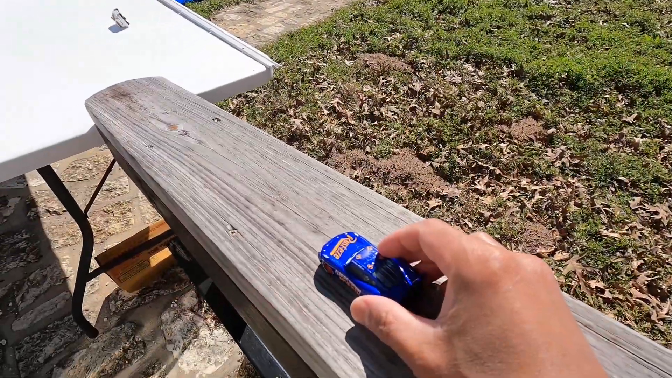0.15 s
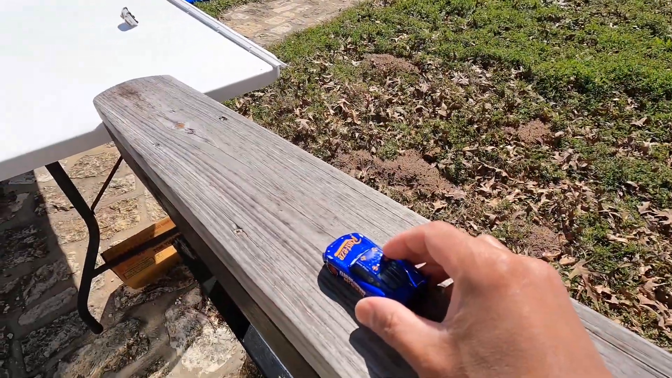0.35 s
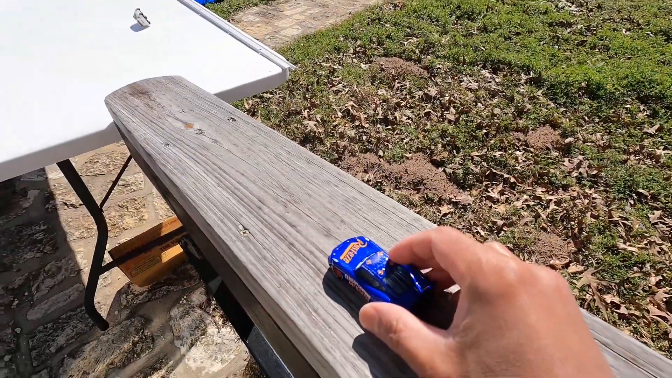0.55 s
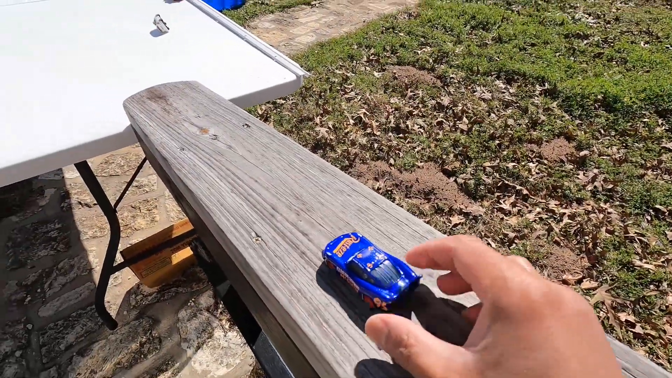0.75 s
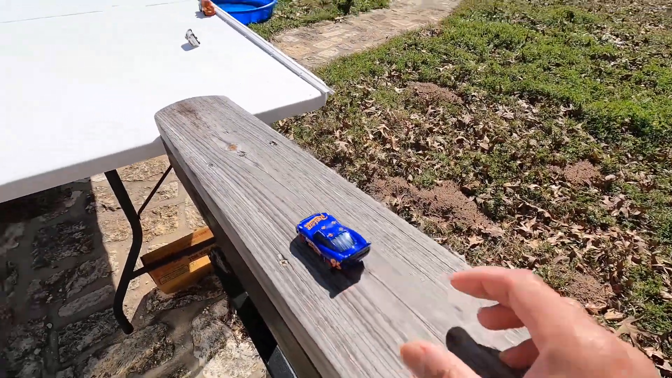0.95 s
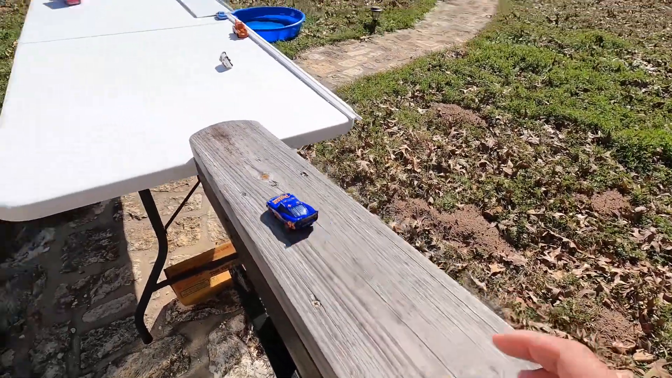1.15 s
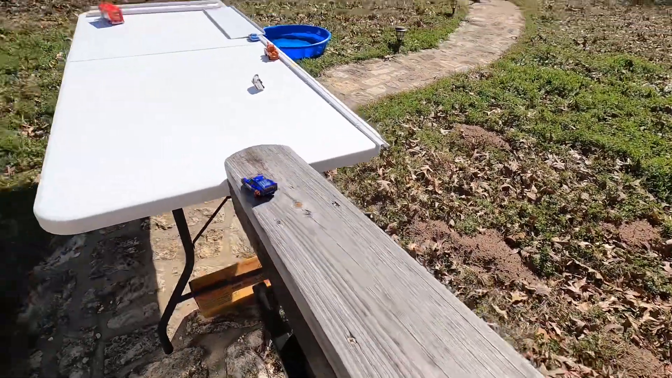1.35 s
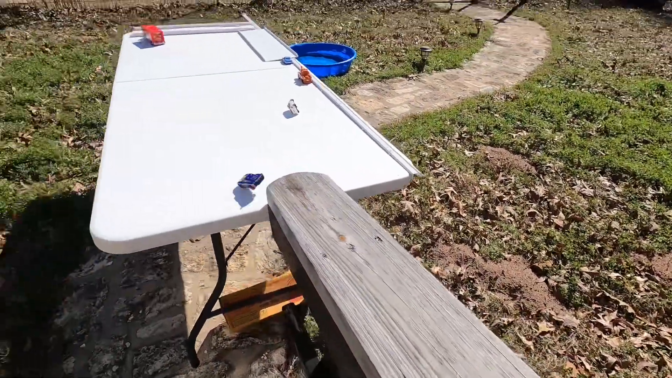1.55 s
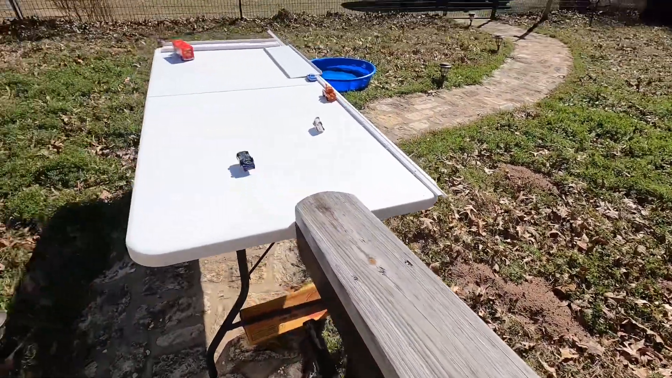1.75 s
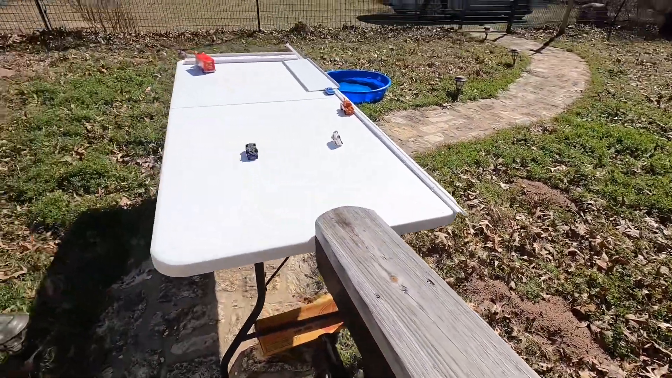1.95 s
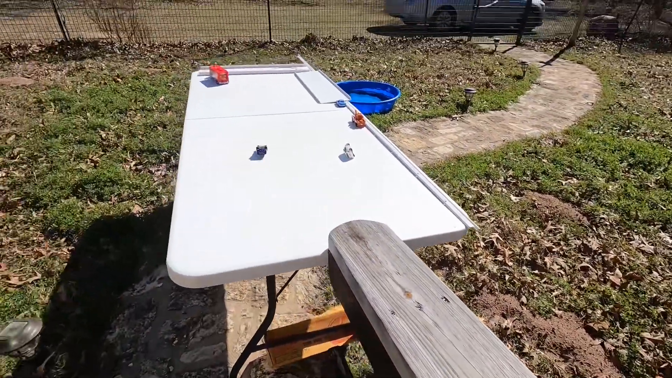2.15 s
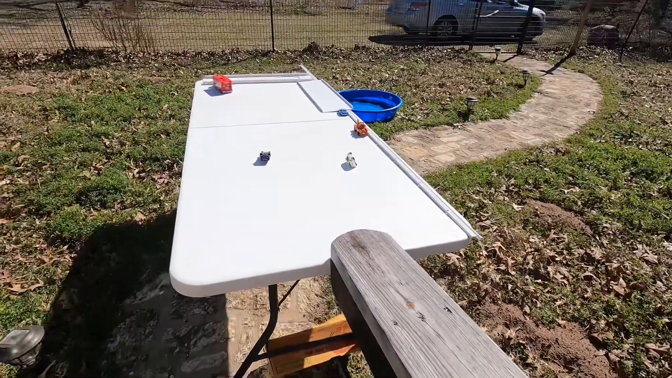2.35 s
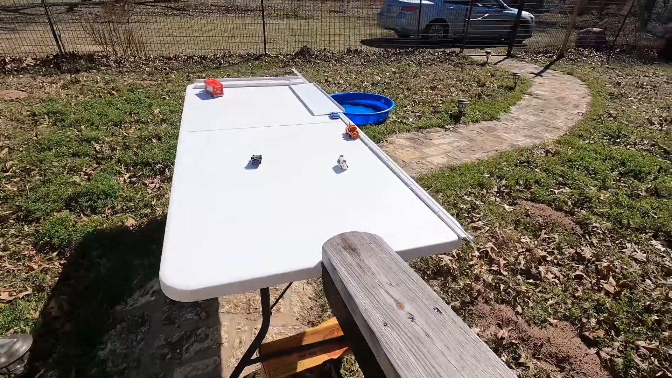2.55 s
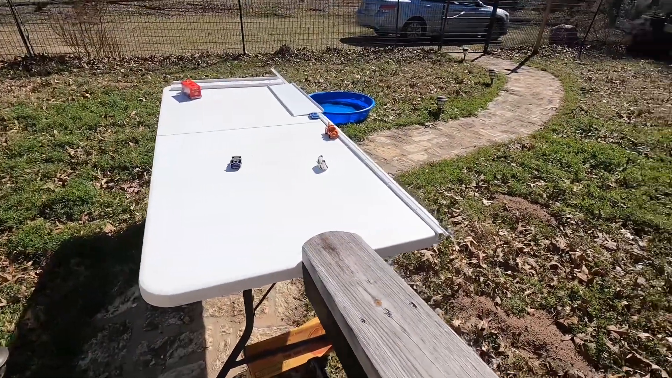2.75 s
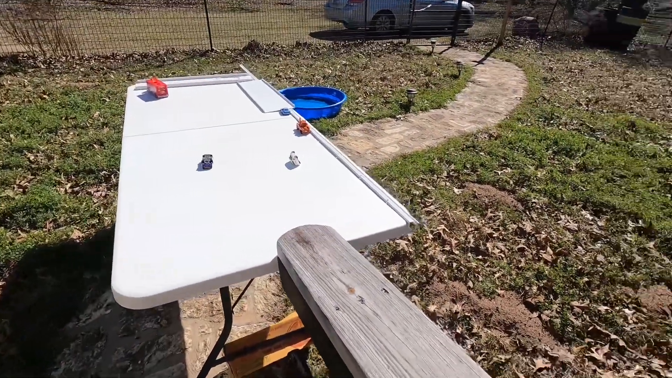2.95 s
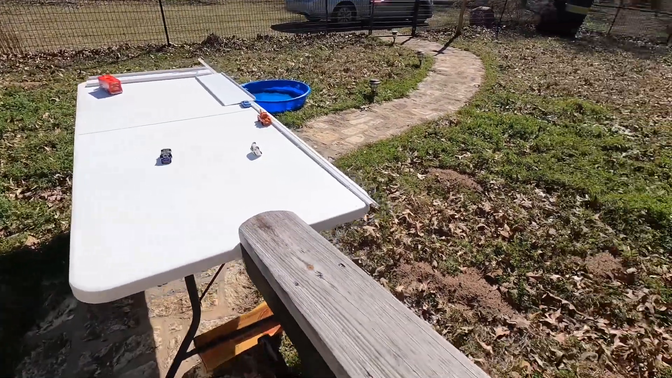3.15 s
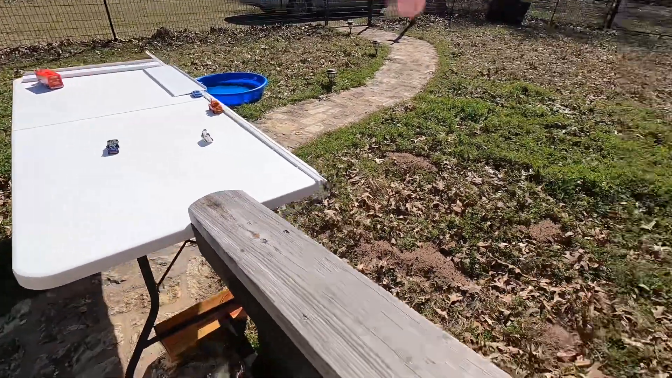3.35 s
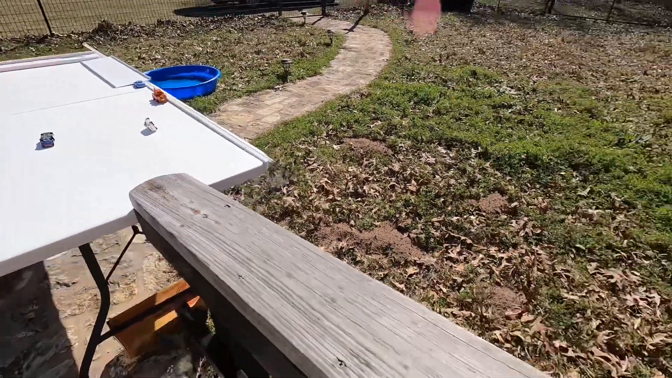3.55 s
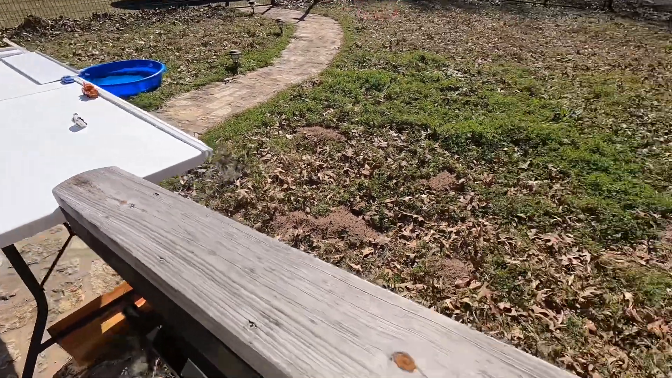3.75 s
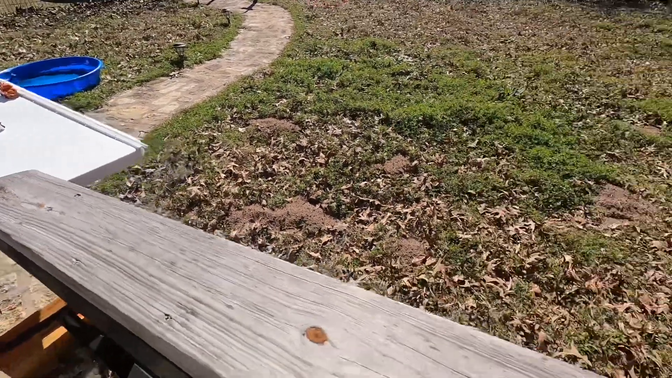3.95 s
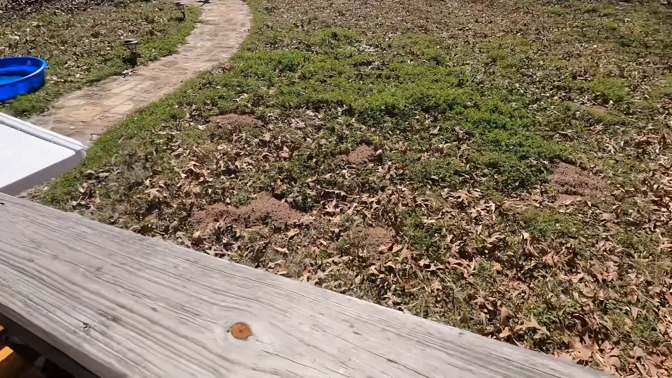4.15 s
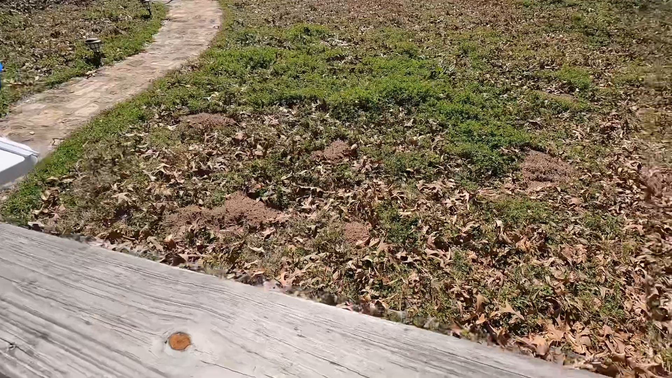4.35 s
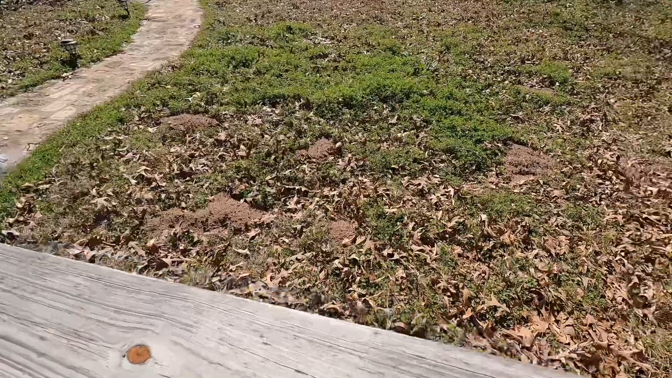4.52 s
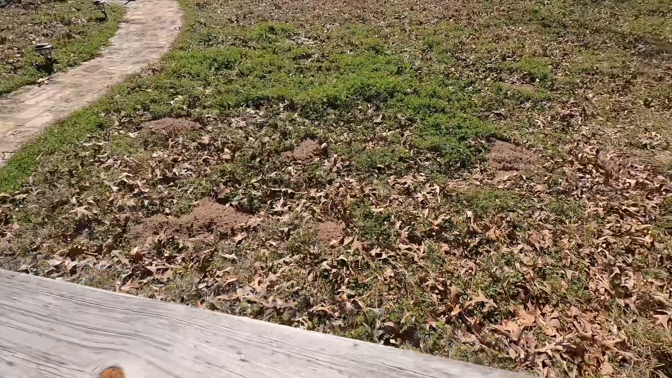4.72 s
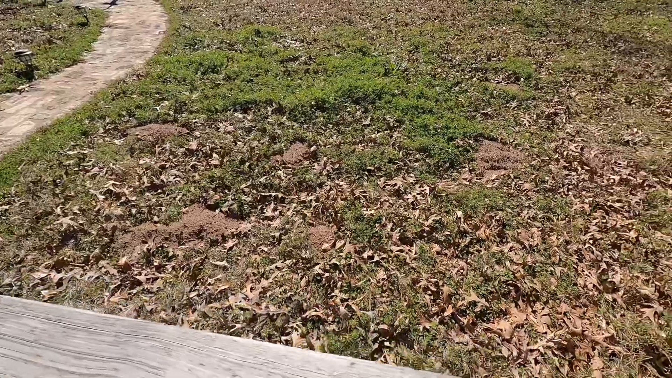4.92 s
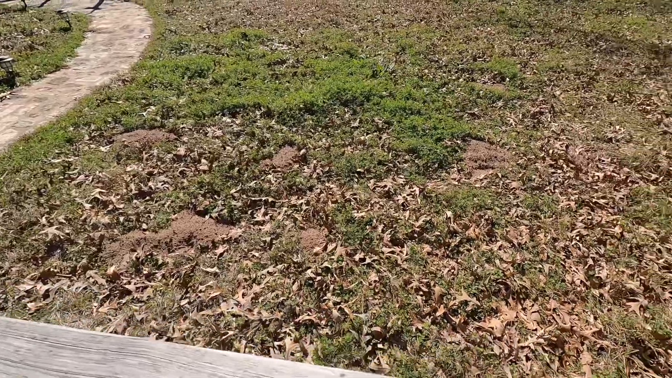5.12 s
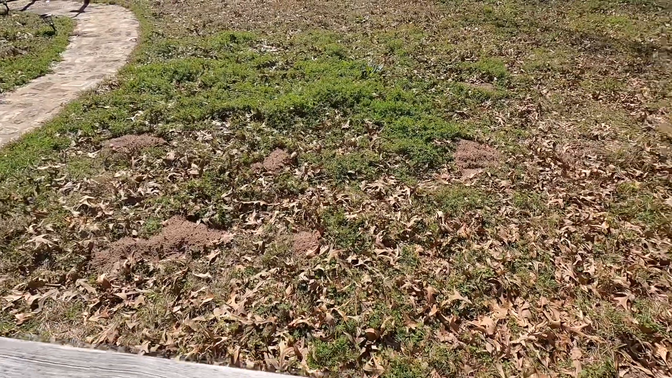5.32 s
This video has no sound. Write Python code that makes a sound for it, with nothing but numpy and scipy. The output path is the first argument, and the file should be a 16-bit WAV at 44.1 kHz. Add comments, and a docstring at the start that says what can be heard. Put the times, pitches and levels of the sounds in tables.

```python
"""A light wind over even garden hiss, then a die-cast toy car rattles down a sloping wooden plank, moving away
from the microphone, drops onto a plastic folding table, bounces and rolls out while the hollow top drones.
A lone knock follows; at the end something is handled close by with knocks, scrapes and squeaks.
Random contacts excite resonances for rolling and dragging, decaying modes make the blows, wandering sines
the friction notes, and shaped noise the wind and the air."""
import sys
import numpy as np
from scipy import signal
from scipy.fft import rfft, irfft, next_fast_len
from scipy.io import wavfile
from scipy.ndimage import uniform_filter1d

SR = 44100
rng = np.random.default_rng(int(sys.argv[2]) if len(sys.argv) > 2 else 0)


def store_pcm(level_fs):
    """Save levels as 16-bit WAV."""
    pcm = np.round(np.clip(level_fs, -1, 1) * 32767).astype(np.int16)
    wavfile.write(sys.argv[1], SR, np.atleast_2d(pcm).T)


N = 241793

# modes of the table top with the car on it: (frequency [Hz], relative level [dB], decay by 60 dB [s])
TABLE_MODES = [(135, 3.5, 0.21), (166.8, 0.5, 0.34), (195.5, 2, 0.28), (263, -0.5, 0.21), (311.8, 0, 0.24),
               (380.5, -5, 0.2), (445, -2, 0.18), (502, -3, 0.16), (587, -18, 0.35), (697, -35, 0.089),
               (774, -21, 0.036), (990, -19.5, 0.27), (1127, -0.5, 0.072), (1565, -8, .08),
               (1816, -2.5, 0.11), (1977, 9.5, 0.02), (2330, -12.5, 0.052), (2760, 9, 0.021),
               (2960, -15, 0.022), (3500, -11, 0.054), (3840, -27.5, 0.016), (4500, -18, 0.018),
               (4790, 6.5, .025), (6900, -21, 0.0067), (6560, -3, .02), (9250, 2, 0.04)]


def from_db(db):
    """Decibels to gain."""
    return 10 ** (np.asarray(db) / 20)


def rms_one(x):
    """Scale to unit rms."""
    return x / np.sqrt(np.mean(x ** 2) + 1e-20)


def in_time(rows):
    """Each column of a curve at every sample."""
    s, *columns = np.transpose(rows)
    return [np.interp(np.arange(N) / SR, s, column) for column in columns]


def at_hz(points, hz):
    """Read a table along log frequency."""
    f, value = np.transpose(points)
    return np.interp(np.log(np.maximum(hz, 1)), np.log(f), value)


def band(x, low_hz, high_hz):
    """Causal band-pass; neighbouring bands meet in opposite phase, so they are joined with opposite signs."""
    edges = [low_hz, min(high_hz, SR / 2 - 1000)]
    return signal.sosfilt(signal.butter(2, edges, "band", fs=SR, output="sos"), x + 1e-18)


def shaped(x, response):
    """Filter by a gain, real or complex, given as a function of frequency."""
    size = next_fast_len(N + 4096)
    hz = np.arange(size // 2 + 1) * SR / size
    return irfft(rfft(x, size) * response(hz), size)[..., :N]


def coloured(x, spectrum):
    """Give a steady excitation its spectrum, cut below half the lowest listed frequency; rms 1."""
    return rms_one(shaped(x, lambda hz: from_db(at_hz(spectrum, hz)) * (hz > spectrum[0][0] / 2)))


def drift(rate):
    """Straight lines between random values of spread 1, `rate` of them a second."""
    knots = rng.standard_normal(8192)
    return np.interp(np.arange(N) / SR * rate, np.arange(len(knots)), knots)


def evened(x, window_s):
    """Hold the short-time rms at 1."""
    power = uniform_filter1d(x ** 2, max(int(window_s * SR), 8))
    return x / np.sqrt(np.abs(power) + 1e-12)


def grains(per_s, spread_db):
    """Random tiny contacts of uneven size and either sign."""
    sizes = from_db(spread_db * np.minimum(rng.exponential(1, N), 4)) * rng.choice([-1, 1], N)
    return sizes * (rng.random(N) < per_s / SR)


def ring(x, hz, t60):
    """A unit click sets a sine ringing from about height 1, falling 60 dB in t60 seconds."""
    r, w = from_db(-60 / (t60 * SR)), 2 * np.pi * hz / SR
    return signal.lfilter([0, np.sin(w)], [1, -2 * r * np.cos(w), r * r], x + 1e-18)


def add(out, s, sound):
    """Mix a sound in at time s."""
    at = max(round(s * SR), 0)
    out[at:at + len(sound)] += sound[:N - at]


def swells(rows):
    """Gain of overlapping swells; each climbs tenfold in its rise time and sinks tenfold in its fall time."""
    t = np.arange(N) / SR
    power = 0
    for s, db, rise, fall in rows:
        power = power + from_db(db - 20 * np.maximum((s - t) / rise, (t - s) / fall)) ** 2
    return np.sqrt(power)


def held(start_s, stop_s, release_db_per_s, attack_db_per_s=450):
    """Attack, hold at gain 1, release."""
    t = np.arange(N) / SR
    attack_db = -attack_db_per_s * np.maximum(start_s - t, 0)
    return from_db(attack_db - release_db_per_s * np.maximum(t - stop_s, 0))


def wavering_tone(hz, waver_hz, rate, flutter_db):
    """A friction note that wanders in pitch and strength; rms 1."""
    phase = 2 * np.pi * np.cumsum(hz + waver_hz * drift(rate)) / SR
    return rms_one(np.sin(phase) * from_db(flutter_db * drift(rate)))


def chassis(clicks):
    """The loose wheels and axles ring for only a few cycles, each resonance broad and quickly damped."""
    # resonances of wheels and chassis: (frequency [Hz], width [Hz], relative level [dB])
    resonances = [(1450, 820, -3), (1872, 556, 7), (2280, 715, 5), (2930, 650, -2), (4090, 480, -4.5),
                  (5210, 290, -6), (6970, 1550, -12.5), (9260, 150, -11.5), (9900, 1300, -23),
                  (13100, 2000, -67)]
    out = 0
    for k, (hz, width, db) in enumerate(resonances):
        r = np.exp(-np.pi * width / SR)
        feed = [(1 - r * r) / 2, 0, (r * r - 1) / 2]
        feedback = [1, -2 * r * np.cos(2 * np.pi * hz / SR), r * r]
        out = out + (-1) ** k * from_db(db) * signal.lfilter(feed, feedback, clicks + 1e-18)
    return out


def plank_roll(per_s=700, spread_db=6.5, hiss=0.52, jolt_db=-2.5, top_hz=11000, rattle_top_hz=2700,
               lift_db_per_s=220):
    """Wood grain shakes the chassis, louder and brighter with speed; ridges jolt it, and the plank rumbles."""
    # wheels jolting over ridges of the grain: (time less 1.1 ms [s], peak level before jolt_db [dB])
    jolts = [(0.8823, -24), (0.8914, -26), (0.9123, -26), (0.9428, -30), (0.966, -20.5), (0.9764, -20),
             (0.9907, -20), (1.0155, -20), (1.0478, -29), (1.094, -24.5), (1.1065, -21.5), (1.1354, -17),
             (1.1407, -20.5), (1.1544, -21), (1.2035, -23), (1.2268, -20), (1.2472, -21.5), (1.2784, -24),
             (1.3129, -22), (1.3333, -17), (1.3376, -20), (1.3527, -19.5), (1.362, -18), (1.3823, -23),
             (1.424, -17.5), (1.4417, -21.5)]
    # the car gathers speed evenly from its release to the plank's end, moving away from the microphone
    release_s, plank_end_s = 0.61, 1.457
    plank_m, microphone_m = 1, 0.34
    # level at full speed beside the microphone [dB], growth [dB per tenfold speed]
    rattle_db, rattle_growth_db = -30, 30
    treble_db, treble_growth_db = -37, 36
    # the plank rumbles faintly, and much more over the last stretch, where it rests on the table
    wood_db, resting_db, resting_s = -58, -42.5, 1.345
    jolt_settle_s = 0.003

    speed = np.clip((np.arange(N) / SR - release_s) / (plank_end_s - release_s), 1e-6, 1)
    distance_m = np.hypot(microphone_m, plank_m * speed ** 2)
    nearness = held(release_s, plank_end_s, lift_db_per_s) * microphone_m / distance_m
    rattle = nearness * from_db(rattle_db + rattle_growth_db * np.log10(speed))
    treble = nearness * from_db(treble_db + treble_growth_db * np.log10(speed))
    rumble = from_db(wood_db) * nearness
    rumble += from_db(resting_db) * held(resting_s, plank_end_s, release_db_per_s=70.5)

    contacts = grains(per_s, spread_db) + hiss * rng.standard_normal(N)
    body = chassis(contacts)
    out = rattle * evened(band(body, 860, rattle_top_hz), 0.096)
    out -= treble * evened(band(body, 4100, top_hz), 0.26)
    # colour of the plank: (frequency [Hz], relative level [dB])
    wood = [(90, -26.5), (150, 2.5), (195, 14), (260, -21.5), (450, -9), (800, -20.5), (1400, -11.5),
            (3000, -32.5)]
    out += rumble * evened(coloured(contacts, wood), 0.018)

    t = np.arange(1000) / SR
    for s, peak_db in jolts:
        settling = 0.16 * rng.standard_normal(len(t)) * np.exp(-t / jolt_settle_s)
        jolt = band(chassis((t == 0) + settling), 450, top_hz)
        add(out, s + 0.0011, from_db(peak_db + jolt_db) * jolt / np.abs(jolt).max())
    return out


def table_roll(boom_db=-2, skid_rumble_db=3, uneven_db=4.5, echo=1.0, far_s=0.012, near_s=.009):
    """The pebbled plastic top drones under the wheels, an uneven rattle above that fades as the car slows."""
    # the drone's pitch wanders as the car crosses the top: (time [s], pitch [Hz])
    drone_pitch = [(1.87, 178.3), (1.96, 151.7), (2.05, 158.7), (2.13, 134.1), (2.19, 160.3), (2.24, 125.5),
                   (2.31, 146), (2.42, 158), (2.7, 135), (2.82, 101.5)]
    # colour of the rattle: (frequency [Hz], relative level [dB])
    rattle_colour = [(260, 6.5), (400, 0.5), (600, -3.5), (800, -14), (990, -5.5), (1300, -9.5),
                     (1790, -10), (2100, -11.5), (2330, -7), (2600, -14), (5200, -21.5), (7800, -30.5),
                     (12000, -31.5), (15000, -32)]
    # rolls: (start [s], stop [s], drone [dB], rumble [dB], rattle [dB])
    rolls = [(1.827, 2.16, -36, -39.5, -45), (2.185, 2.3, -37, -57, -52), (2.758, 2.833, -45, -84, -48.5)]
    # the loose wheels skid and clatter: (time [s], peak level [dB], rise [s], fall [s])
    skids = [(1.865, -40, 0.044, 0.073), (1.99, -52.5, 0.042, 0.087), (2.18, -46.5, 0.047, 0.052)]
    # wheel noise fades as the car slows and dies when it stops; the hollow top rings on
    slowing_db_per_s, wheel_release_db_per_s, top_release_db_per_s = 13.5, 600, 172.5

    pitch, = in_time(drone_pitch)
    contacts = grains(per_s=2000, spread_db=2)
    top = 0
    for k, (hz, db, t60) in enumerate(TABLE_MODES[:12]):
        top = top + from_db(db) * ring(contacts, hz, t60) * (-1) ** k
    low = wavering_tone(pitch, waver_hz=8.47, rate=42, flutter_db=2.0)
    low += from_db(boom_db) * evened(band(top + 45 * contacts, 60, 254), 0.04)

    fine = coloured(contacts, rattle_colour)
    # waves return from the table's edge ever sooner as the car rolls on, so the colour sweeps
    lag, = in_time([(1.87, far_s), (2.3, near_s)])
    fine += echo * np.interp(np.arange(N) - lag * SR, np.arange(N), fine)
    middle = evened(band(fine + 0.15 * rms_one(top), 285, 820), 0.049)
    high = from_db(uneven_db * drift(60)) * evened(band(fine, 1580, 13000), 0.14)

    out = swells(skids) * (high - from_db(skid_rumble_db) * middle)
    for start, stop, drone_db, rumble_db, rattle_db in rolls:
        slowing = from_db(-slowing_db_per_s * (np.arange(N) / SR - start))
        wheels = held(start, stop, wheel_release_db_per_s) * slowing
        out += from_db(drone_db) * held(start, stop, top_release_db_per_s) * low
        out += wheels * (from_db(rattle_db) * high - from_db(rumble_db) * middle)
    return out


def axles():
    """Spinning wheels sing thinly on their wire axles, the high note only while the car rolls out."""
    # swells of the low note: (time [s], peak level [dB], rise [s], fall [s])
    low_swells = [(1.5, -51, 0.2, 0.07), (1.88, -48, 0.02, 0.07), (2.19, -54, 0.06, 0.42)]
    low = swells(low_swells) * wavering_tone(5130, waver_hz=66.0, rate=240, flutter_db=6.5)
    high_gain = from_db(-56.5) * held(1.87, 2.15, release_db_per_s=500)
    return low + high_gain * wavering_tone(10160, waver_hz=218, rate=300, flutter_db=6.0)


def blows(rows, modes, trim_db, clack_share, dense_db, dense_t60, tail_db, tail_t60, tail_hz, crack_db,
          chatter, note_t60):
    """Each blow cracks, chatters for a few ms and rings strong modes, a dense field of weaker ones and a note."""
    # edges of the four bands a blow is levelled in: [Hz]
    edges_hz = [90, 600, 2000, 6000, 15000]
    out, t = np.zeros(N), np.arange(SR // 2) / SR
    head = t < .02
    for s, thud_db, clack_db, chatter_s, note_hz, note_db in rows:
        first = 1. * (t == 0)
        again = (rng.random(len(t)) < 2500 / SR) * rng.standard_normal(len(t))
        again = again * np.exp(-(t / chatter_s) ** 2 / 2)
        contact = first + chatter * again
        # the heavy low modes feel only the first push, the light ones every re-contact
        light = contact / np.sqrt(np.sum(contact ** 2))
        body = 0
        for k, (hz, db, t60) in enumerate(modes):
            gain = from_db(db + 2.6 * rng.standard_normal()) * (-1) ** k
            body = body + gain * ring(first if hz < 520 else light, hz, t60)
        # the dense modes are fed while the chatter lasts; the duller ones have their own decay
        quick, slow, sharp = rng.standard_normal((3, len(t)))
        dense = band(quick, 300, 5000) * from_db(-60 * np.maximum(t - chatter_s, 0) / dense_t60)
        tail = band(slow, 120, tail_hz) * from_db(-60 * t / tail_t60)
        crack = sharp * np.exp(-t / 0.0017)
        note = ring(contact, note_hz, note_t60)
        sound = rms_one(body)
        for db, layer in [(dense_db, dense), (tail_db, tail), (crack_db, crack), (note_db, note)]:
            sound = sound + from_db(db) * rms_one(layer)
        sound = band(sound, 60, 11000)
        # the bass follows the thud, the treble the clack, and the middle lies between them
        band_db = [thud_db, thud_db + clack_share * (clack_db - thud_db), clack_db, clack_db]
        for k, (db, trim) in enumerate(zip(band_db, trim_db)):
            part = band(sound, edges_hz[k], edges_hz[k + 1])
            add(out, s, (-1) ** k * from_db(db + trim) * part / np.sqrt(np.mean(part[head] ** 2)))
    return out


def landings():
    """The car's blows set the table top's modes ringing under the clack of the car."""
    # blows, levels before trim: (time [s], thud of the table [dB], clack of the car [dB], chatter [s],
    # pitch of the car's ring [Hz], level of that ring against the modes [dB])
    impacts = [(1.469, -46.5, -30, 0.00079, 2140, 0.5), (1.483, -58.5, -48, 0.0036, 5250, -9),
               (1.559, -17.5, -21.5, 0.0055, 3240, -3.5), (1.591, -47.5, -22, 0.0074, 2760, 2.5),
               (1.6455, -33.5, -30.5, 0.0041, 2200, 6.5), (1.708, -21, -26, 0.0011, 2350, -7),
               (1.7945, -20, -30, 0.0047, 2676, 1.5), (1.803, -42, -28, 0.0031, 2320, -4.5),
               (1.8335, -21.5, -31, 0.0076, 2280, -3.5), (1.851, -24.5, -32, 0.0075, 2240, 0.5),
               (2.184, -31, -55, 0.008, 2320, 10), (2.29, -43.5, -56, 0.005, 2340, 5),
               (2.831, -31, -37.5, 0.0078, 2407, 11)]
    return blows(impacts, TABLE_MODES, trim_db=[-1.5, -6.5, -0.5, -14.5], clack_share=0.58,
                 dense_db=-1.0, dense_t60=0.045, tail_db=-7.5, tail_t60=0.33, tail_hz=1440,
                 crack_db=-5.5, chatter=0.87, note_t60=0.015)


def handling_knocks():
    """Knocks ring the handled thing's modes, each with a faint note of random pitch."""
    # knocks, levels before trim: (time [s], thud [dB], clack [dB], chatter [s])
    knocks = [(4.561, -28, -42, 0.0025), (4.573, -31.5, -36, 0.0017), (4.633, -31.5, -35, 0.0013),
              (4.687, -35.5, -50, 0.006), (4.756, -34.5, -41.5, 0.0011), (4.783, -37, -47, 0.0019),
              (4.801, -28, -41, 0.0012), (4.827, -29.5, -39.5, 0.0058), (4.865, -28.5, -43, 0.0027),
              (4.877, -25.5, -38.5, 0.0025), (4.972, -36, -58, 0.0056), (5.004, -27.5, -39, 0.015),
              (5.038, -33, -34.5, 0.0018), (5.101, -36.5, -29, 0.0053), (5.117, -37, -36, 0.015),
              (5.141, -21.5, -37, 0.001), (5.151, -25.5, -31.5, 0.0077), (5.164, -30, -36, 0.0026),
              (5.178, -23.5, -43.5, 0.005), (5.196, -44, -33.5, 0.0024), (5.231, -29.5, -53, 0.0024),
              (5.28, -30.5, -32, 0.003), (5.302, -40, -51, 0.003), (5.331, -36, -58, 0.0023)]
    # modes of the handled thing: (frequency [Hz], relative level [dB], decay by 60 dB [s])
    handled_modes = [(233, -11, 0.023), (364.4, -8, 0.16), (586, 2.5, 0.017), (634, -10, 0.044),
                     (990, -9, 0.083), (1450, 2.5, 0.025), (1620, 6.5, 0.013), (1960, 9, 0.015),
                     (2880, 17, 0.0033), (3400, -12, 0.083), (3676, -3, 0.022), (4540, -27, 0.024),
                     (6780, -15, 0.091), (7000, -2, 0.015), (8600, -23, 0.022)]
    low_hz, high_hz, note_db = 1356, 2050, -3
    pitches = low_hz + (high_hz - low_hz) * rng.random(len(knocks))
    rows = [(*knock, hz, note_db) for knock, hz in zip(knocks, pitches)]
    return blows(rows, handled_modes, trim_db=[-4.0, -3.5, -3.5, -25.5], clack_share=0.37,
                 dense_db=-3.5, dense_t60=0.026, tail_db=-5.5, tail_t60=0.15, tail_hz=1760,
                 crack_db=-15.5, chatter=0.99, note_t60=0.024)


def scrape():
    """Uneven slips as the handled thing is dragged."""
    # drags between the knocks: (time [s], peak level [dB], rise [s], fall [s])
    drags = [(4.62, -39, 0.086, 0.13), (4.885, -32.5, 0.29, 0.058), (5.16, -26, 0.047, 0.14),
             (5.3, -31.5, 0.34, 0.043)]
    # colour of the slips: (frequency [Hz], relative level [dB])
    scrape_colour = [(180, 23.5), (370, 16.5), (520, 15), (750, -2), (1000, 11.5), (1480, 13.5), (1950, 9),
                     (2400, 6), (3400, -5), (6200, -11.5), (9800, -24), (15000, -42)]
    slips = grains(per_s=1200, spread_db=4.0)
    return swells(drags) * evened(coloured(slips, scrape_colour), 0.057)


def squeaks(waver_hz=70, flutter_db=3):
    """The handled thing catches: short rough friction notes that start at once and die away."""
    # catches: (time [s], level before the envelope [dB], pitch [Hz])
    catches = [(4.803, -25, 1466), (4.833, -28.5, 1685), (5.036, -28.5, 1676), (5.058, -32, 1755),
               (5.095, -25, 1930), (5.101, -17, 1575), (5.118, -25, 1600), (5.28, -19, 1960),
               (5.302, -23.5, 1450)]
    attack_s, t60_s = 0.00051, 0.076
    out, t = np.zeros(N), np.arange(SR // 4) / SR
    envelope = (1 - np.exp(-t / attack_s)) * from_db(-60 * t / t60_s)
    for s, db, hz in catches:
        tone = wavering_tone(hz, waver_hz, rate=440, flutter_db=flutter_db)[:len(t)]
        add(out, s, from_db(db) * envelope * tone)
    return out


def handling(lowest_hz=190):
    """Knocks, drags and squeaks of a light thing with little bass."""
    high_pass = signal.butter(2, lowest_hz, "high", fs=SR, output="sos")
    return signal.sosfilt(high_pass, handling_knocks() + scrape() + squeaks())


def brush():
    """Soft dry friction of dense tiny contacts, like a sleeve moving."""
    # soft strokes: (time [s], peak level [dB], rise [s], fall [s])
    strokes = [(3.05, -57.5, 0.17, 0.15), (3.27, -61, 0.22, 0.39), (3.43, -56.5, 0.2, 0.24),
               (3.66, -45.5, 0.051, 0.047), (3.87, -61, 0.11, 0.41), (3.995, -51.5, 0.021, 0.015),
               (4.568, -34, 0.016, 0.02), (4.872, -35, 0.018, 0.022)]
    # colour of the friction: (frequency [Hz], relative level [dB])
    brush_colour = [(300, -8.5), (750, -9.5), (1300, -2.5), (3200, -8.5), (5500, -13), (8000, -20),
                    (12500, -25.5), (15000, -33)]
    return swells(strokes) * coloured(grains(per_s=7800, spread_db=5), brush_colour)


def wind(level_db=2):
    """Rumble on the ports swells with each gust; a passing eddy is one suck and push of pressure."""
    # gusts, before level_db and port balance: (time [s], peak level [dB], rise [s], fall [s])
    gusts = [(0.18, -54.5, 0.21, 0.37), (0.68, -50, 0.36, 2.3), (1.8, -50.5, 0.66, 1),
             (3.82, -43.5, 1, 1.5), (4.31, -41, 0.14, 0.15), (4.61, -35.5, 0.21, 0.29),
             (5.05, -35.5, 0.23, 0.35)]
    # colour of the rumble: (frequency [Hz], relative level [dB])
    wind_colour = [(20, 1), (40, 3), (70, -2), (120, -15.5), (200, -18.5), (400, -63)]
    # single buffets, before port balance: (time [s], peak level [dB], half width [s])
    buffets = [(3.341, -36, 0.0018), (3.463, -35.5, 0.0018), (3.749, -20, 0.0025), (3.824, -28.5, 0.0026),
               (3.981, -26, 0.0018), (4.261, -35, 0.0028), (4.682, -19, 0.0023), (4.994, -30, 0.005)]
    breeze_db = -63.5  # steady breeze, before level_db and port balance
    level = np.hypot(from_db(breeze_db), swells(gusts))
    rumble = evened(coloured(rng.standard_normal(N), wind_colour), 0.2)
    out = from_db(level_db) * level * rumble
    for s, peak_db, width in buffets:
        u = np.clip((np.arange(N) / SR - s) / width, -20, 20)
        out += from_db(peak_db) * u * np.exp((1 - u * u) / 2)
    return out * from_db([[-2.5], [2]])  # left, right


def garden_air(level_db=-59.5):
    """Far, even hiss; each port hears a shared noise plus or minus a second one, mixed by frequency."""
    # colour of still garden air: (frequency [Hz], relative level [dB])
    air_colour = [(120, -9.5), (210, -1), (320, -7.5), (480, -14), (720, -24), (1300, -16.5), (2200, -21.5),
                  (3500, -21.5), (5600, -21), (7500, -26), (8500, -35), (10500, -35.5), (12500, -52.5),
                  (16000, -62.5)]
    # left over right port: (frequency [Hz], level [dB])
    air_balance = [(60, 18), (180, -2), (550, -5), (1650, 1.5), (4970, -0.5), (15000, 4.5)]
    # how alike the ports are: (frequency [Hz], likeness [0 to 1])
    air_likeness = [(60, 1), (180, 0.81), (550, 0.37), (1650, 0.16), (4970, 1), (15000, 0.55)]

    def alike(hz):
        """Likeness of the ports at each frequency, kept below 1."""
        return np.clip(at_hz(air_likeness, hz), 0, .99)

    mid, side = rng.standard_normal((2, N))
    pair = shaped(mid, lambda hz: np.sqrt(1 + alike(hz)))
    pair = pair + shaped(side, lambda hz: np.sqrt(1 - alike(hz))) * [[1], [-1]]
    pair = shaped(pair, lambda hz: from_db(np.outer([.5, -.5], at_hz(air_balance, hz))))
    return from_db(level_db) * coloured(pair, air_colour)


def placed(x, balance, phase, scatter_db, scatter_t60):
    """Level and phase differ between the ports; deck and ground scatter a faint short tail."""
    t = np.arange(SR // 3) / SR
    tail = band(rng.standard_normal((2, len(t))), 400, 13000) * from_db(-60 * t / scatter_t60)
    tail *= t > .003
    tail /= np.sqrt(np.sum(tail ** 2, axis=1, keepdims=True))
    pair = x + from_db(scatter_db) * signal.fftconvolve(x[None], tail, axes=1)[:, :N]
    half = np.array([[.5], [-.5]])
    return shaped(pair, lambda hz: from_db(half * at_hz(balance, hz)) * np.exp(1j * half * at_hz(phase, hz)))


def scene():
    """The car ahead, the handling close by, wind and garden all round."""
    # left over right port, car and handling: (frequency [Hz], level [dB])
    car_balance, near_balance = [(150, -1.2), (900, -3), (2400, -1.5), (5000, 0), (11000, 0.5), (12500, 10),
                                 (14500, -4)], [(150, -0.5), (700, -4), (2700, -5), (3400, -10.5),
                                                      (5000, -4), (7000, -1), (11000, -1), (12400, 18),
                                                      (14000, 2)]
    # lead of the left port, car and handling: (frequency [Hz], phase [rad])
    car_phase, near_phase = [(100, -0.57), (500, 0.43), (2900, -0.36), (4500, -0.34), (11700, -0.5),
                             (12600, -1.4)], [(900, 0.16), (2800, -0.97), (4700, -0.29), (11000, 0.069)]
    car = plank_roll() + table_roll() + axles() + landings()
    ahead = placed(car + brush(), car_balance, car_phase, scatter_db=-16, scatter_t60=0.12)
    close_by = placed(handling(), near_balance, near_phase, scatter_db=-13.5, scatter_t60=0.08)
    return ahead + close_by + wind() + garden_air()


def record(dry):
    """The microphone dulls the last octave, and the top is cut steeply."""
    dull = signal.sosfilt(signal.butter(2, 13500, fs=SR, output="sos"), dry)
    cutoff_hz = 15500
    return signal.sosfilt(signal.ellip(10, .1, 80, cutoff_hz, fs=SR, output="sos"), dull)


dry = scene()
out = record(dry)
store_pcm(out)
```